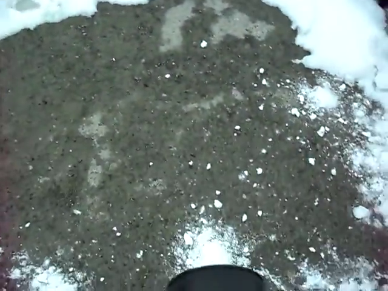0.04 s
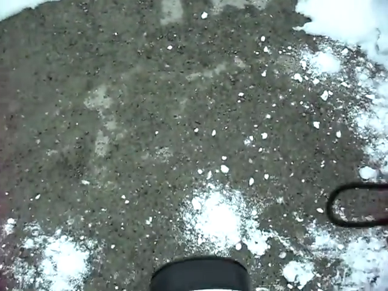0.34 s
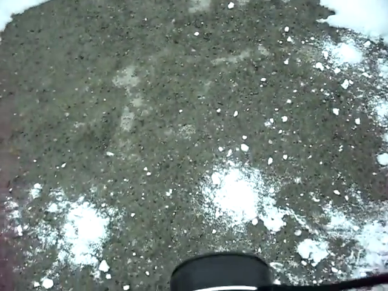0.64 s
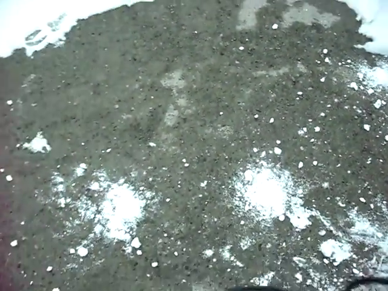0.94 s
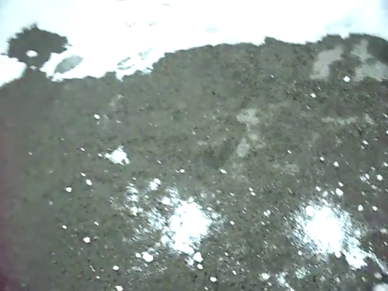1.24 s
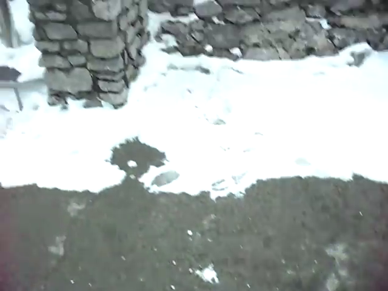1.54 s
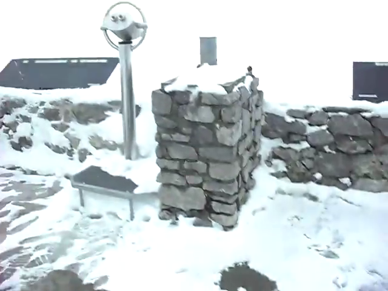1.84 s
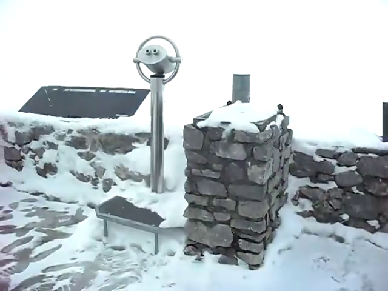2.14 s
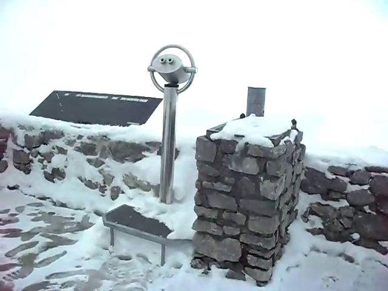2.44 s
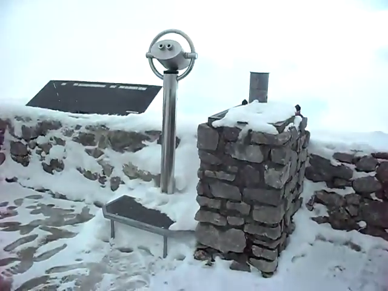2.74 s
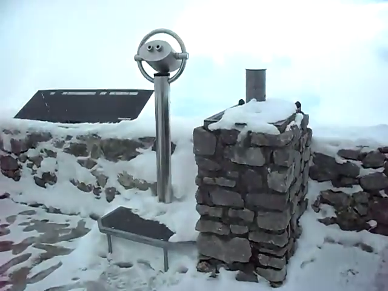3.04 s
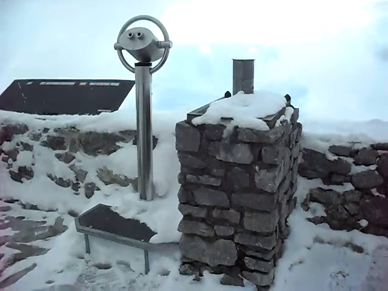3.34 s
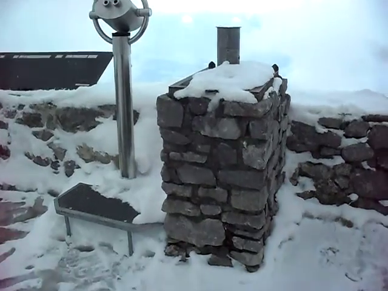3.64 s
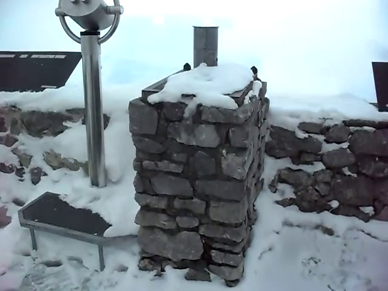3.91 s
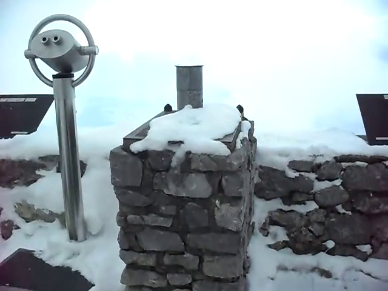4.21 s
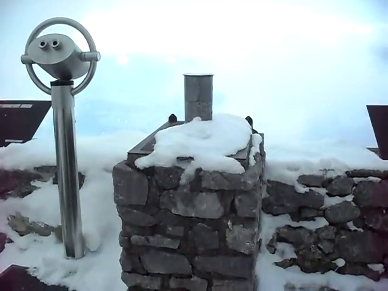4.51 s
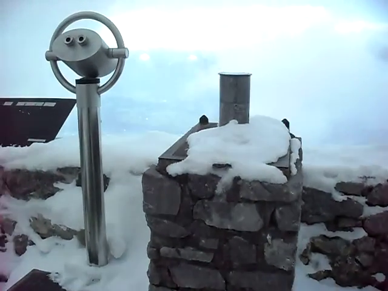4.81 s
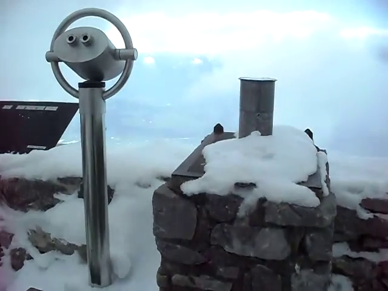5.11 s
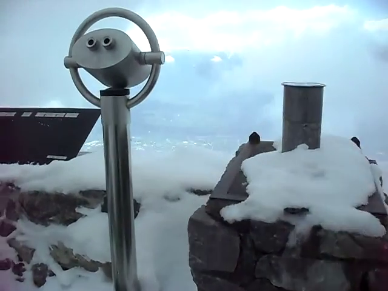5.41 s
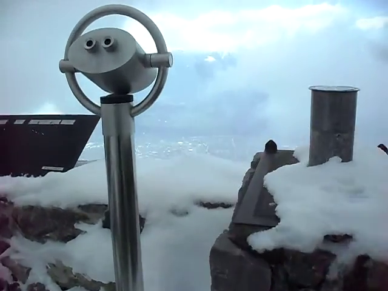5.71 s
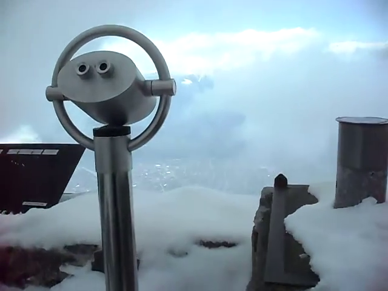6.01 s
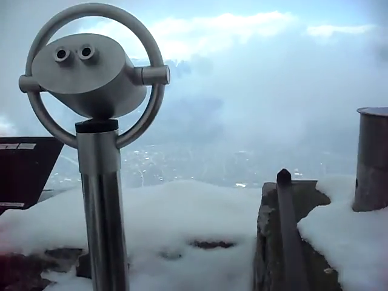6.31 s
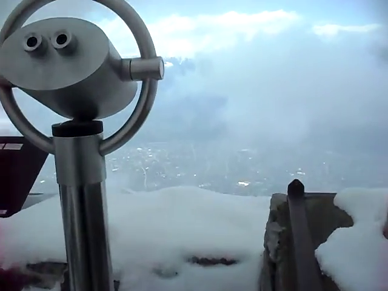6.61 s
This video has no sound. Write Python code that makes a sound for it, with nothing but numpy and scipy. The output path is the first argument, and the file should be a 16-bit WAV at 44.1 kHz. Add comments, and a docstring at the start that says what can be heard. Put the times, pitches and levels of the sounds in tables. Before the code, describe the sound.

Sharp, close plastic clacks of a dangling lens cap over gusty wind rumble, then soft footsteps crunching on grit and snow.

```python
"""A plastic lens cap on its cord knocks on a hand-held camera, bounces and scrapes along the shell.
Blows ring the cap's modes; sliding drives it by stick-slip. The carrier takes a few steps on a
snowy terrace: soles shuffle, grit snaps, packed snow collapses in dull slips.
Gusts buffet the microphone over a steady hiss. Close and dry, no echo."""
import sys
import numpy as np
from scipy import signal
from scipy.fft import rfft, irfft, next_fast_len
from scipy.io import wavfile
from scipy.ndimage import uniform_filter1d

SR = 44100
rng = np.random.default_rng(int(sys.argv[2]) if len(sys.argv) > 2 else 0)


def unload_wav(signal):
    """Save mono or channel-first audio to the path in sys.argv[1] as 16-bit WAV at rate SR, clipped to [-1, 1]."""
    wavfile.write(
        sys.argv[1],
        SR,
        np.round(np.clip(np.atleast_2d(signal).T, -1, 1) * 32767).astype(np.int16),
    )


N = 298071
TIME_S = np.arange(N) / SR


def lens_cap(highpass_hz=800, order=6):
    """Knocks plus slides; so small a disc radiates almost no bass."""
    highpass = signal.butter(order, highpass_hz, "high", fs=SR, output="sos")
    return signal.sosfilt(highpass, cap_knocks() + cap_slides())


# Cap modes: f/Hz, t60/s, face level/dB, rim level/dB, edge level/dB
CAP_MODES = [(970, 0.048, -22, -29, -32), (1460, 0.018, -5, -6.5, -20), (2220, 0.009, -10, 0.5, -29),
             (2490, 0.0085, -2.5, -0.5, -21), (2880, 0.018, -2.5, -15.5, -2), (3320, 0.0077, -55, -1, 4),
             (4095, 0.01, -2.5, -5.5, -22), (4560, 0.016, -17, -16, -12), (5070, 0.013, -10, -4.5, -6),
             (5940, 0.0051, -7, -35, 10.5), (6530, 0.006, 3.5, -7, 8.5), (7200, 0.009, -4.5, -26, -6),
             (7900, 0.0047, -21, -9.5, -1), (8670, 0.0071, 3, -12.5, -15), (9080, 0.0066, -31, -15, -2),
             (9880, 0.0065, -10.5, -34, -28)]
def cap_ring(contact, tilt_db_oct, max_delay_s=0.000378, count=2000):
    """One blow, unit energy; the contact point (0 face, 1 rim, 2 edge) weights the modes."""
    t, ring = np.arange(count) / SR, np.zeros(count)
    for hz, t60_s, *place_db in CAP_MODES:
        db = np.interp(contact, np.arange(3), place_db) + tilt_db_oct * np.log2(hz)
        age_s = np.maximum(t - rng.uniform(0, max_delay_s), 0)  # bending waves arrive staggered
        decay = np.exp(-np.log(1000) * age_s / t60_s)
        ring += rng.choice([-1, 1]) * gain_of(db) * decay * np.sin(2 * np.pi * hz * age_s)
    return ring / np.linalg.norm(ring)


# Cap on camera: t/s, relative level/dB, contact/0-2, tilt/(dB/oct), first gap/s, bounce loss/dB
KNOCKS = [(1.821, -3, 0.27, -0.5, 0.0096, 7.5), (1.9225, -30, 0, -10, 0.0048, 9),
          (2.441, -8.5, 0.91, 1.5, 0.011, 4.5), (2.655, -29, 1.5, -4, 0.014, 7),
          (2.6782, -10.5, 1.88, 2, .013, 13), (3.5981, -6.5, 0.2, -2, .008, 8),
          (4.1632, -3, 0.25, 0.5, 0.0076, 4.5), (4.2566, -22.5, 0.94, -11, .004, 18)]
def bounces(count=5, gap_ratio=0.6, dulling_db_oct=2.8):
    """Each knock rebounds ever sooner, softer and duller."""
    for s, db, contact, tilt_db_oct, gap_s, loss_db in KNOCKS:
        for k in range(count):
            yield s, db - k * loss_db, contact, tilt_db_oct - k * dulling_db_oct
            s += gap_s * gap_ratio ** k


def cap_knocks(gain_db=9, crack_db=-14, crack_s=0.0005, count=2000):
    """Each impact: a dry crack and a short ring of plastic."""
    out, t = np.zeros(N), np.arange(count) / SR
    crack_hz_db = [(400, -47), (1200, 49), (6000, -33), (12000, -4)]
    for s, db, contact, tilt_db_oct in bounces():
        crack = coloured(rng.standard_normal(count), crack_hz_db, tilt_db_oct) * np.exp(-t / crack_s)
        knock = cap_ring(contact, tilt_db_oct) + gain_of(crack_db) * crack / np.linalg.norm(crack)
        add(out, s, gain_of(db + gain_db) * knock)
    return out


# Cap sliding on camera: t/s, length/s, relative level/dB, resonance f/Hz, its power share/0-1
SLIDES = [(1.841, 0.06, -44.5, 950, 0.06), (1.88, 0.059, -42, 940, 0.23), (1.984, 0.043, -56, 925, .3),
          (2.264, .04, -62.5, 1770, 0.36), (2.597, 0.057, -54.5, 1160, 0.28),
          (2.655, .105, -46, 1170, 0.27), (2.821, 0.027, -59.5, 1130, 0.5),
          (3.012, .019, -47.5, 1300, 0.56), (3.609, 0.047, -42.5, 915, 0.17),
          (3.717, 0.059, -51.5, 1456, 0.45), (4.18, 0.087, -45, 1460, 0), (4.284, 0.02, -48.5, 1450, 0.7),
          (4.336, 0.047, -47, 1510, .35), (4.489, 0.028, -50, 2680, 0.12),
          (4.542, 0.028, -51.5, 2870, 0.95), (4.633, 0.0082, -42, 1375, 1)]
# Rubbing spectrum: f/Hz, level/dB
RUB_SPECTRUM = [(500, -31), (780, -18), (960, -25), (1150, -9), (1480, 6.5), (1900, -5), (2300, 1.5),
                (2950, 0), (3500, -15), (4150, -17), (5400, -31), (6600, -18), (9000, -38), (12000, -48)]
def cap_slides(slips_per_s=2500, spread_db=4, ring_db=-7, rub_db=-2, chatter_db=0.7, width_hz=105):
    """Clustered stick-slip: cap modes, broad rubbing and the resonance of the pressed cap."""
    out = np.zeros(N)
    for s, length_s, db, hz, share in SLIDES:
        count = int(length_s * SR)
        pressure = evened(stroke(count) * clumps(count, 0.00298, chatter_db))
        slips = [grains(count, slips_per_s, spread_db) * pressure for _ in range(3)]
        ring = signal.fftconvolve(slips[0], cap_ring(contact=0.23, tilt_db_oct=-22))
        rub = evened(coloured(slips[1], RUB_SPECTRUM))
        squeak = evened(resonator(np.pad(slips[2], (0, count)), hz, width_hz))
        broad_gain = gain_of(db) * np.sqrt(1 - share)
        add(out, s, broad_gain * gain_of(ring_db) * ring)
        add(out, s, broad_gain * gain_of(rub_db) * rub)
        add(out, s, gain_of(db) * np.sqrt(share) * squeak)
    return out


def camera_thuds(gain_db=-33, thud_hz=480, decay_s=0.0017, count=900):
    """Each impact gives the camera shell a faint, dull push."""
    out, t = np.zeros(N), np.arange(count) / SR
    thud = np.sin(2 * np.pi * thud_hz * t) * np.exp(-t / decay_s)
    for s, db, _, _ in bounces():
        add(out, s, gain_of(db + gain_db) * thud)
    return out


# Large grains cracking: t/s, relative level/dB, centre f/Hz, width/oct
GRIT = [(.752, -20.5, 2070, 0.28), (.899, -31, 2190, 0.61), (3.5216, -28, 2400, 0.23),
        (4.8119, -23, 6760, 0.68), (4.836, -27.5, 2600, 0.19), (4.8945, -19, 4270, 0.83),
        (5.0863, -17, 2840, 0.37), (5.1373, -26, 4000, 1.6), (5.175, -14.5, 2600, 0.89),
        (5.188, -13.5, 2400, 1), (5.3069, -25.5, 2140, 1.14), (5.486, -33.5, 1780, .65),
        (5.8574, -26, 2450, 0.86), (5.9199, -28, 4000, 5.1), (6.422, -31, 2000, 0.6),
        (6.5198, -34, 3500, .85), (6.551, -33, 3200, 0.77), (6.562, -27, 2350, .8)]
def grit(snap_s=0.00045, crumble_s=0.0015, crumble_db=-17, body_db=-9, gain_db=5, count=900):
    """A stone grain snaps, its crumbs follow; the sole above adds body."""
    out, t = np.zeros(N), np.arange(count) / SR
    hz = np.fft.rfftfreq(count, 1 / SR) + 1
    body = gain_of(body_db) * np.exp(-0.5 * np.log2(hz / 1100) ** 2)
    envelope = np.exp(-t / snap_s) + gain_of(crumble_db) * np.exp(-t / crumble_s)
    for s, db, centre_hz, width_oct in GRIT:
        band = np.exp(-0.5 * (np.log2(hz / centre_hz) / width_oct) ** 2) + body
        snap = envelope * irfft(band * np.exp(2j * np.pi * rng.random(len(hz))), count)
        add(out, s, gain_of(db + gain_db) * snap / np.linalg.norm(snap))
    return out


# Snow giving way underfoot: t/s, length/s, relative level/dB, f/Hz
CRUNCHES = [(1.452, .006, -43, 600), (1.508, .006, -40.5, 546), (3.521, .006, -31.5, 640),
            (3.904, .019, -36.5, 695), (4.529, .006, -35, 814), (4.547, .033, -29.5, 390),
            (5.125, .04, -36.5, 1880), (5.173, .006, -21.5, 1050), (5.1877, .006, -19.5, 1850),
            (5.614, .012, -37.5, 680), (5.741, .012, -36.5, 610), (6.305, .006, -40.5, 1010),
            (6.378, .033, -28.5, 950), (6.4225, .006, -27, 1090), (6.5066, .013, -26, 1020)]
def snow(slip_gap_s=0.006, jitter=0.15, detune=0.2, decay_s=0.0014, roughness=0.48, count=900):
    """Packed snow collapses in dull slips, singly or in runs, each a few rough cycles long."""
    out, t = np.zeros(N), np.arange(count) / SR
    crumb_hz_db = [(200, -8), (500, 5), (1000, 10.5), (1500, -23.5), (2500, -3), (9000, -24.5)]
    envelope = np.sqrt(t / decay_s) * np.exp(0.5 - t / decay_s)
    for s, length_s, db, hz in CRUNCHES:
        slips = max(round(length_s / slip_gap_s), 1)
        for k, (late, sharp) in enumerate(rng.uniform(-1, 1, (slips, 2))):
            crumbs = evened(coloured(rng.standard_normal(count), crumb_hz_db))
            tone = np.sin(2 * np.pi * hz * (1 + detune * sharp) * t)
            slip = (tone + roughness * crumbs) * envelope
            load = np.sin(np.pi * (k + 0.5) / slips)
            add(out, s + slip_gap_s * (k + jitter * late), gain_of(db) * load * slip)
    return out


# Sole pressure in the shuffle: t/s, relative level/dB
SHUFFLE = [(4.655, -51), (4.911, -47.5), (4.985, -56), (5.081, -48), (5.16, -55)]
# Shuffle spectrum: f/Hz, level/dB
SHUFFLE_SPECTRUM = [(120, -10), (250, 2), (400, 1.5), (600, 2), (900, -2), (1800, -7), (2900, -10),
                    (3600, -15), (9800, -15), (12000, -40.5), (14000, -70)]
# Sole scuffs: t/s, length/s, level/dB, tilt/(dB/oct)
SCUFFS = [(0.752, 0.014, -46.5, -1.5), (0.885, 0.032, -55.5, -1.5), (1.116, .046, -58, 4),
          (1.436, 0.092, -57.5, -7.5), (2.13, .08, -52.5, -3), (2.898, 0.065, -51, 2.5),
          (3.454, 0.081, -51, 0), (3.892, 0.045, -57, -.5), (4.531, 0.062, -47.5, 2),
          (4.598, 0.093, -53, 0), (5.129, 0.065, -48.5, 3.5), (5.167, 0.03, -35, 2),
          (5.194, .039, -55, 0.5), (5.848, 0.041, -53.5, -3.5), (6.379, 0.036, -45, -3.5),
          (6.425, 0.049, -52.5, -2), (6.507, 0.028, -49.5, -.5)]
# Scuff spectrum: f/Hz, level/dB
SCUFF_SPECTRUM = [(120, -28), (300, -2), (600, 1.5), (1000, -3), (1400, -3.5), (2000, -8), (2900, -9),
                  (3700, -20), (9800, -22), (12000, -44), (14000, -70)]
def soles(grains_per_s=5000, spread_db=4, shuffle_db=-1, clump_db=2):
    """Fine grains break under a dragging sole: one clumpy shuffle and short, denser scuffs."""
    s, db = np.transpose(SHUFFLE)
    pressure = np.interp(TIME_S, s, gain_of(db + shuffle_db), left=0, right=0)
    breaks = grains(N, grains_per_s, spread_db) * clumps(N, 0.0087, clump_db)
    out = uniform_filter1d(pressure, size=800) * evened(coloured(breaks, SHUFFLE_SPECTRUM))
    for s, length_s, db, tilt_db_oct in SCUFFS:
        count = int(length_s * SR)
        breaks = grains(count, 2 * grains_per_s, spread_db / 2)
        scuff = evened(coloured(breaks, SCUFF_SPECTRUM, tilt_db_oct))
        add(out, s, gain_of(db) * scuff * stroke(count))
    return out


# Breeze on the microphone: t/s, relative level/dB
BREEZE = [(0.0, -53), (0.45, -50.5), (1.18, -54), (1.62, -43.5), (1.84, -51.5), (2.09, -54.5),
          (2.35, -41.5), (2.58, -51), (2.77, -36), (3.16, -31.5), (3.82, -39), (4.46, -37.5), (4.86, -47.5),
          (5.42, -42.5), (5.91, -44), (6.06, -49), (6.23, -58), (6.76, -43)]
# Gusts: t/s, length/s, push level/dB, relative eddy level/dB
GUSTS = [(0.391, 0.038, -40.5, -69), (1.235, .06, -44, -67), (1.424, 0.21, -38.5, -54),
         (1.663, 0.046, -33.5, -48.5), (1.914, 0.034, -57, -42), (2.143, 0.061, -29, -40.5),
         (2.211, 0.041, -30, -40), (2.518, .14, -29, -39), (2.672, 0.15, -30, -39),
         (2.807, 0.096, -31.5, -47.5), (2.984, 0.12, -36, -35.5), (3.078, 0.12, -31, -29),
         (3.242, 0.051, -30, -38), (3.326, 0.16, -32.5, -40.5), (3.523, 0.057, -28.5, -39),
         (3.61, 0.16, -33.5, -42.5), (3.951, 0.067, -28, -37), (4.036, 0.084, -29.5, -38.5),
         (4.299, 0.15, -35.5, -45.5), (4.539, 0.073, -41, -44), (4.65, 0.14, -47, -46),
         (5.26, 0.064, -38.5, -65), (6.383, 0.1, -45.5, -49.5)]
def wind_levels_db(breeze_gain_db=2, calm_eddy_db=-62, calm_db=-50, eddy_slope=0.48, gust_power=0.39):
    """Slow push and small eddies: the breeze plus one arch per gust, summed in power."""
    breeze_db = np.interp(TIME_S, *np.transpose(BREEZE)) + breeze_gain_db
    push = gain_of(breeze_db) ** 2
    eddies = gain_of(calm_eddy_db + eddy_slope * (breeze_db - calm_db)) ** 2
    for s, length_s, push_db, eddy_db in GUSTS:
        arch = stroke(int(length_s * SR), exponent=gust_power)
        add(push, s, (gain_of(push_db) * arch) ** 2)
        add(eddies, s, (gain_of(eddy_db) * arch) ** 2)
    return 10 * np.log10(push), 10 * np.log10(eddies)


# Slow push spectrum: f/Hz, level/dB
BUFFET_SPECTRUM = [(8, -4.5), (25, 4.5), (45, 1.5), (75, -2.5), (110, -12.5), (150, -26.5), (250, -53),
                   (500, -84)]
# Small eddy spectrum: f/Hz, level/dB
EDDY_SPECTRUM = [(60, -35), (110, 2.5), (160, 3.5), (230, -4.5), (330, -16), (500, -30.5), (900, -39.5),
                 (2500, -77)]
# Flutter spectrum: f/Hz, level/dB
FLUTTER_SPECTRUM = [(120, -31), (250, -6), (380, 3.5), (550, -3), (900, -20.5), (1600, -16.5), (4000, -50)]
def wind(eddy_gain_db=-2.5, strong_flutter_db=-46, flutter_slope=1.7, strong_db=-28):
    """Gusts push on the microphone and shed eddies; the strongest flutter into the midrange."""
    push_db, eddy_db = wind_levels_db()
    flutter_db = strong_flutter_db + flutter_slope * (eddy_db - strong_db)
    buffet = turbulence(BUFFET_SPECTRUM, push_db, eddy_s=0.063) * clumps(N, 0.05, 2.5)
    eddies = turbulence(EDDY_SPECTRUM, eddy_db + eddy_gain_db, eddy_s=0.14) * clumps(N, 0.015, 3.9)
    flutter = turbulence(FLUTTER_SPECTRUM, flutter_db, eddy_s=0.094) * clumps(N, 0.0051, 3.8)
    return buffet + eddies + flutter


def turbulence(spectrum, level_db, eddy_s):
    """Random pressure whose rms over an eddy's life follows level_db."""
    noise = coloured(rng.standard_normal(N), spectrum)
    window = int(eddy_s * SR)
    power = uniform_filter1d(uniform_filter1d(noise ** 2, window), window)
    return gain_of(level_db) * noise / np.sqrt(abs(power) + 1e-20)


# Hardest eddies: t/s, relative level/dB, f/Hz
PUFFS = [(1.68, -25.5, 112), (2.183, -24, 89), (2.231, -28.5, 139), (2.55, -22, 124), (2.629, -24, 108),
         (2.759, -20.5, 74), (3.002, -20.5, 122), (3.054, -16, 123), (3.159, -19.5, 130),
         (3.276, -20.5, 121), (3.987, -19, 106), (4.07, -18, 75)]
def puffs(gain_db=-1, count=4000):
    """An eddy crossing the microphone: one sharp pressure pulse between two soft swells of the other sign."""
    out, t = np.zeros(N), (np.arange(count) - count / 2) / SR
    for s, db, hz in PUFFS:
        phase_sq = (np.pi * hz * t) ** 2
        add(out, s + t[0], gain_of(db + gain_db) * (2 * phase_sq - 1) * np.exp(-phase_sq))
    return out


# Hiss spectrum: f/Hz, level/dB
HISS_SPECTRUM = [(150, -7), (250, 1), (331, -2), (377, -2.5), (650, -5), (754, -6.5), (888, -7),
                 (1030, -7.5), (1230, -8.5), (1480, -8.5), (1580, -9.5), (2860, -13), (9670, -17.5),
                 (10500, -23), (12800, -53.5), (16600, -78), (22000, -120)]
def hiss(level_db=-58):
    """Steady background hiss."""
    return gain_of(level_db) * evened(coloured(rng.standard_normal(N), HISS_SPECTRUM))


def grains(count, per_s, spread_db):
    """Random clicks, most small, a few large; rms 1."""
    size = gain_of(spread_db * np.minimum(rng.exponential(1, count), 4))
    return evened(size * rng.standard_normal(count) * (rng.random(count) < per_s / SR))


def clumps(count, step_s, depth_db):
    """Random gain with a new target every step_s; rms 1."""
    knots = rng.standard_normal(count // 16 + 2).clip(-2, 2)
    wander = np.interp(np.arange(count) / SR / step_s, np.arange(len(knots)), knots)
    return evened(gain_of(depth_db * wander))


def stroke(count, exponent=0.27):
    """Swell and fade as a flattened sine arch; rms 1."""
    return evened(np.sin(np.linspace(0, np.pi, count)).clip(0) ** exponent)


def resonator(x, hz, width_hz):
    """Two-pole band-pass."""
    r = np.exp(-np.pi * width_hz / SR)
    return signal.lfilter([1, 0, -1], [1, -2 * r * np.cos(2 * np.pi * hz / SR), r * r], x)


def coloured(x, spectrum, tilt_db_oct=0):
    """Filters by (f/Hz, level/dB) points plus a tilt."""
    size = next_fast_len(len(x))
    octave = np.log2(np.fft.rfftfreq(size, 1 / SR) + 1)
    hz, db = np.transpose(spectrum)
    shape_db = np.interp(octave, np.log2(hz), db)
    shape_db += tilt_db_oct * np.clip(octave - np.log2(hz[0]), 0, None)
    return irfft(rfft(x, size) * gain_of(shape_db), size)[:len(x)]


def gain_of(db):
    """dB to amplitude."""
    return 10 ** (np.asarray(db) / 20)


def evened(x):
    """Scales to rms 1."""
    return x / np.sqrt(np.mean(x ** 2) + 1e-20)


def add(mix, s, sound):
    """Mixes a sound in at time s."""
    part = mix[max(round(s * SR), 0):][:len(sound)]
    part += sound[:len(part)]


# Microphone response to cap, shell, grit and snow: f/Hz, level/dB
MIC_RESPONSE = [(20, 5.5), (9500, -1), (10500, -4), (11200, -23), (12300, -15)]
def scene():
    """Dry mono mix: snow and open air give no echo."""
    contacts = lens_cap() + camera_thuds() + grit() + snow()
    return (coloured(contacts, MIC_RESPONSE) + soles() + wind() + puffs() + hiss())[None]


def record(dry, cutoff_hz=12400):
    """Band limit of a small camera."""
    lowpass = signal.firwin(255, cutoff_hz, window=("kaiser", 9), fs=SR)
    return signal.oaconvolve(dry, lowpass[None], "same")


dry = scene()
out = record(dry)
unload_wav(out)
```